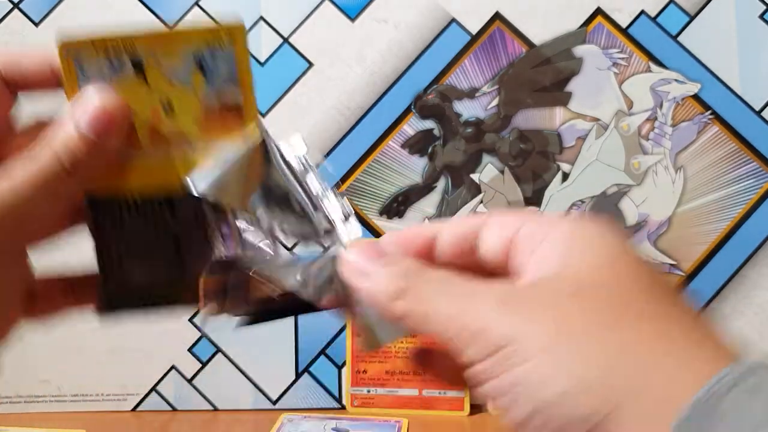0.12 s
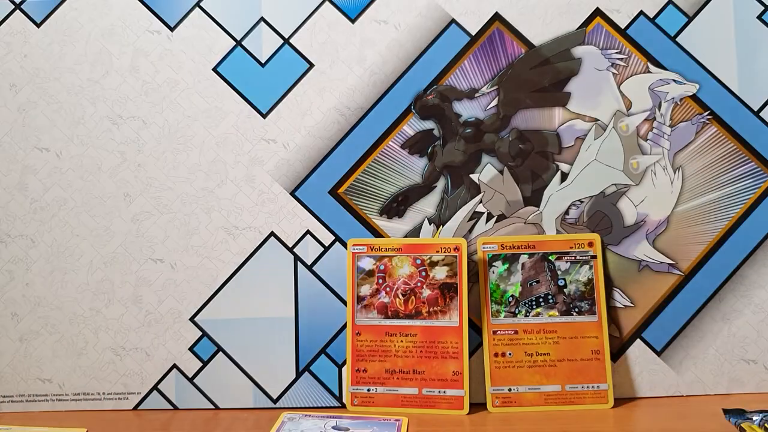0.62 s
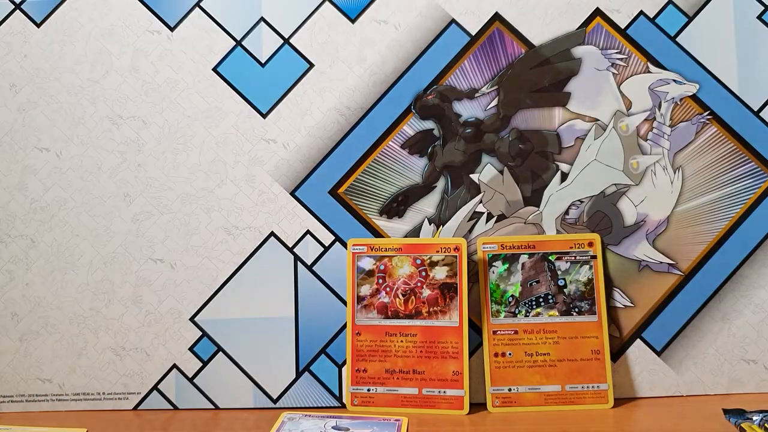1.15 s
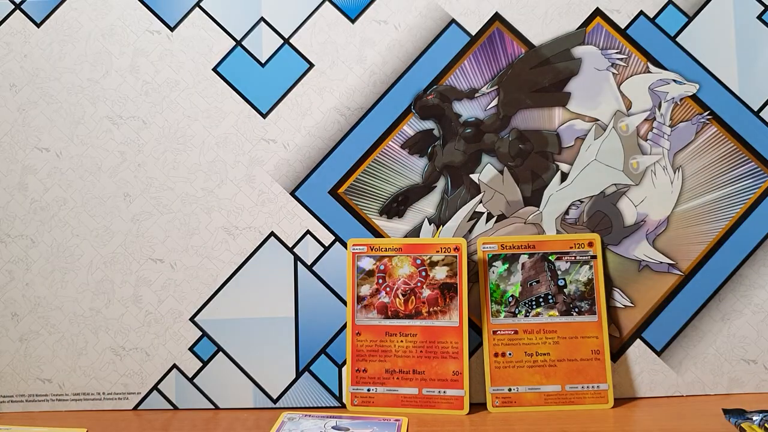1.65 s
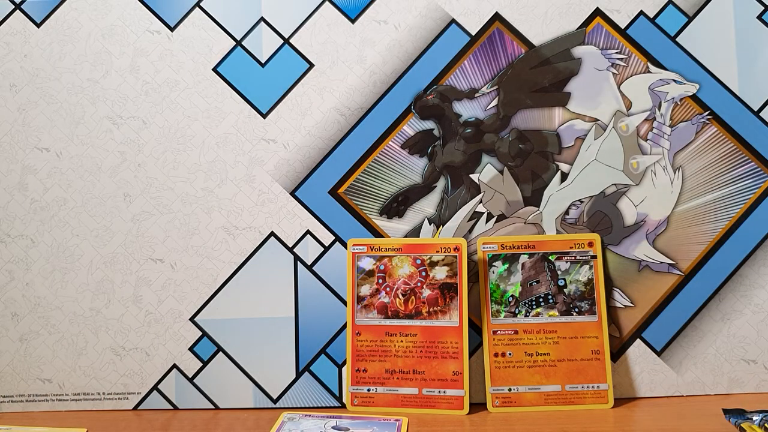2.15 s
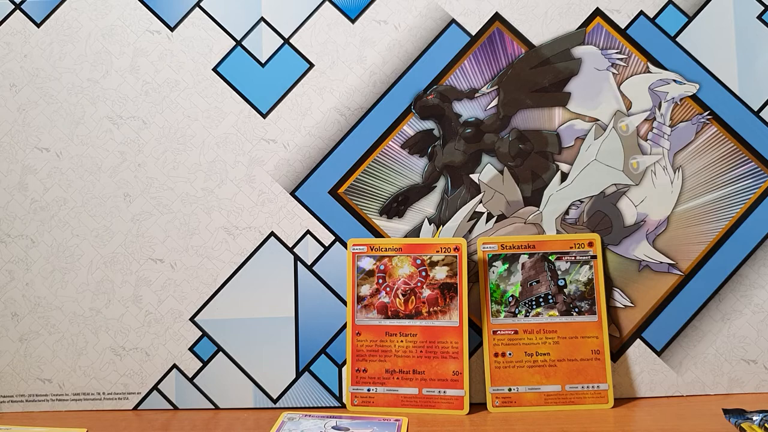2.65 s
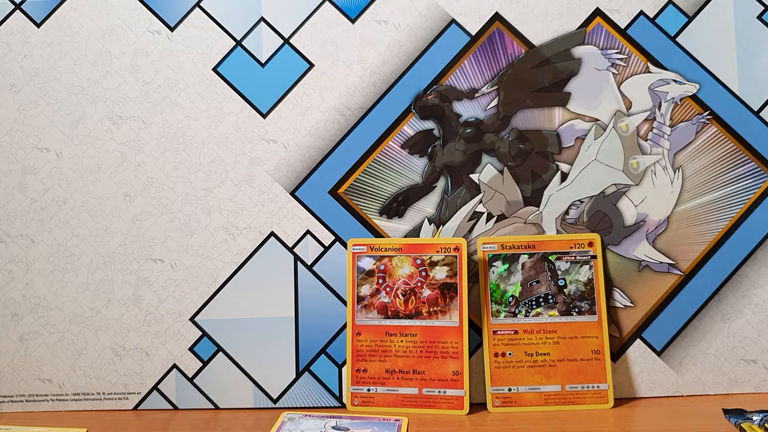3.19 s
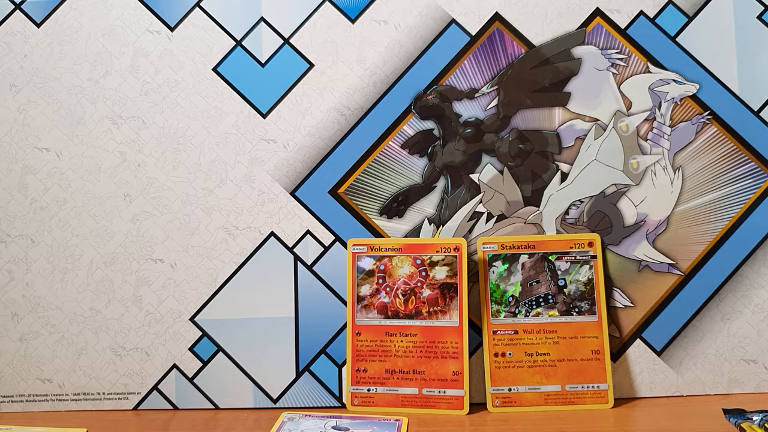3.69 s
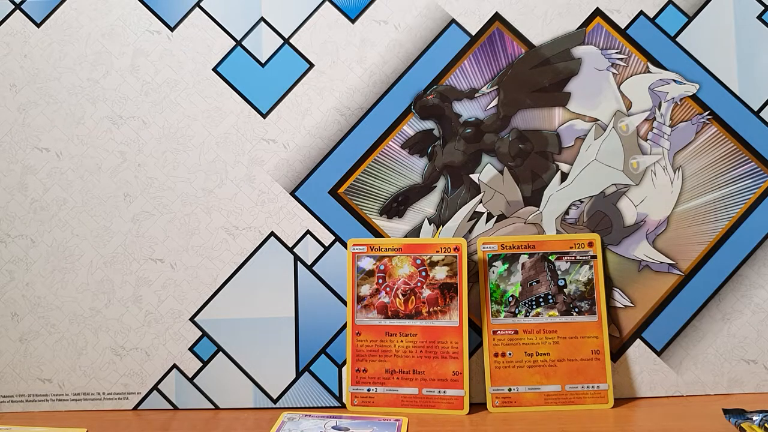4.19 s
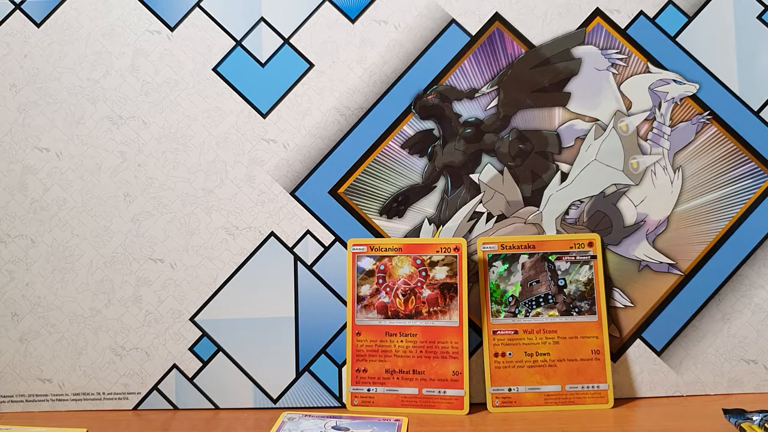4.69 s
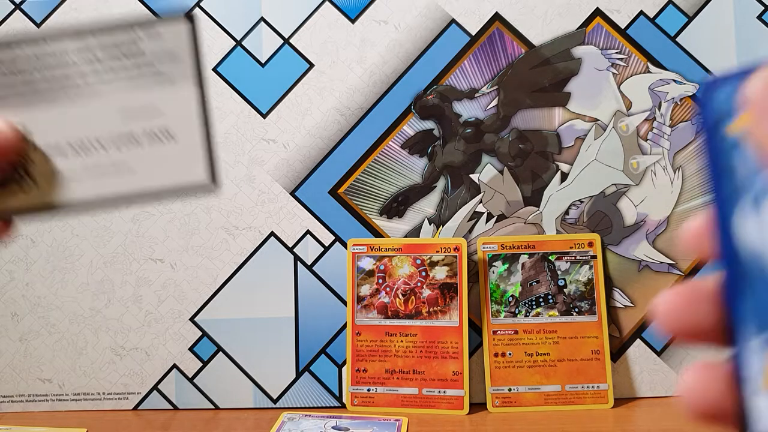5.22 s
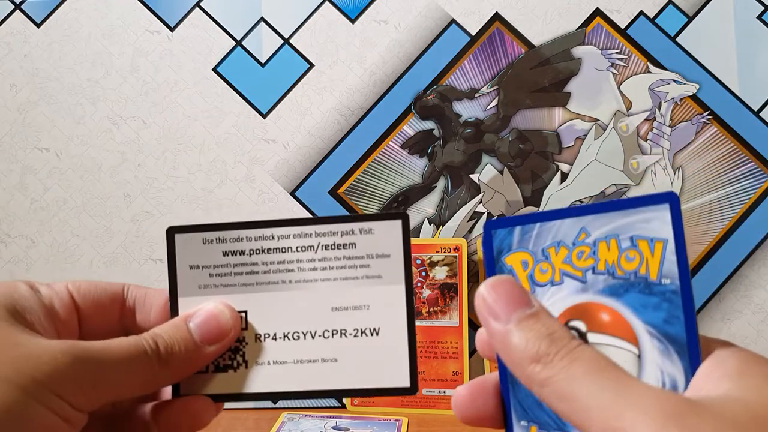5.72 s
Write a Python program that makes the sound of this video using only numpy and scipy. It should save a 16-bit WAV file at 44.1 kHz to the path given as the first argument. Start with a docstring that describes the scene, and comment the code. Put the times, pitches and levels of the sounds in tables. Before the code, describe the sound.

A close stereo phone pickup in a small, quiet room with faint rumble, hum and hiss. At 0-0.25 s foil cracks and crinkles brightly while a hand swing pushes heavy low air over the left port. It drops to near quiet, then small snaps return from 0.7 s. Around 1.0-1.1 s comes a dense, leftward burst of foil crackle and card scuffing with soft bumps on wood. A flat card slap lands at 1.4 s, a lighter one at 1.7 s amid more crinkling. From 2 to 3 s there are mainly muffled hand bumps and skin rubbing the table, then a very faint high squeak. Cards slap at 3.05 and 3.65 s. From 3.9 to 4.8 s, dry card slides and hollow clicks come in quick strokes, with a low puff of air on the left at 4.6-4.7 s. After 5 s only soft bumps and slight rubbing remain.

```python
"""Foil wrapper and thin cards at a wooden table

A small room; hands work beside a phone with two microphone ports. Foil and card edges snap with noise
cracks and short rings, cards slap flat through table and card resonances, and strokes slide cards
and crinkle foil as swelling, grainy noise. Skin rubs the wood, a card squeaks as a gliding sine, and
swings of the hand push air over the left port. Faint rumble, hum and hiss lie under all."""
import sys
import numpy as np
from scipy import signal
from scipy.fft import rfft, irfft, next_fast_len
from scipy.io import wavfile
from scipy.ndimage import uniform_filter1d, map_coordinates

SR = 44100
rng = np.random.default_rng(int(sys.argv[2]) if len(sys.argv) > 2 else 0)


def transcribe(signal):
    """Save signal, clipped to [-1, 1], as a 16-bit WAV file at the path in sys.argv[1]."""
    frames = np.atleast_2d(signal).T
    limited = np.clip(frames, -1, 1)
    pcm = np.round(limited * 32767).astype(np.int16)
    wavfile.write(sys.argv[1], SR, pcm)


def elevation(decibels):
    """Turn decibel levels (scalar or array-like) into linear amplitude ratios."""
    levels = np.asarray(decibels, float)
    return 10 ** (levels / 20)


N = 257479


def unit(x):
    """Scales x to rms 1."""
    return x / np.sqrt(np.mean(x ** 2) + 1e-20)


def along(points, hz):
    """Reads (Hz, value) points on a log frequency axis."""
    f, value = np.transpose(points)
    return np.interp(np.log(hz + 1), np.log(f + 1), value)


def curves(rows, outside=None):
    """Gives one value per sample for each column after the time."""
    s, *columns = np.transpose(rows)
    return [np.interp(np.arange(N) / SR, s, column, outside, outside) for column in columns]


def wobble(rate):
    """Draws a smooth random curve with rate knots a second."""
    knots = rng.standard_normal(int(N * rate / SR) + 4)
    return map_coordinates(knots, [np.arange(N) * rate / SR])


def filtered(x, response):
    """Applies a complex response of frequency to x."""
    m = next_fast_len(N + SR // 2)
    return irfft(rfft(x, m) * response(np.fft.rfftfreq(m, 1 / SR)), m)[..., :N]


def resonances(modes):
    """Causal response of (Hz, width, dB) modes, summed with alternating sign."""
    def response(f):
        total = 0
        for k, (center, width, db) in enumerate(modes):
            damping = 1j * f * width
            total = total + (-1) ** k * elevation(db) * damping / (center * center - f * f + damping)
        return total
    return response


# how alike the two microphone ports hear a sound: pitch_hz, likeness (0 to 1)
PORT_LIKENESS = [(60, 0.78), (300, 0.99), (700, 0.13), (1400, 0.024)]


def pair(spectrum, source):
    """Colours two raw signals and mixes them to the likeness of the two ports, rms 1."""
    def mid_and_side(hz):
        turn = np.arccos(np.clip(along(PORT_LIKENESS, hz), -1, 1)) / 2
        return elevation(along(spectrum, hz)) * [np.cos(turn), np.sin(turn)]
    mid, side = filtered(source, mid_and_side)
    return unit(np.array([mid + side, mid - side]))


def grainy(per_s, spread_db, share):
    """Noise whose loudness jumps at tiny random slips, the same slips on both ports."""
    slips = (rng.random(N) < per_s / SR) * elevation(spread_db * rng.exponential(size=N))
    pole = np.exp(-1 / (0.0038 * SR))  # each jump decays with a 3.8 ms time constant
    jumps = unit(signal.lfilter([1], [1, -pole], slips))
    return rng.standard_normal((2, N)) * (1 - share + share * jumps)


def patchy(x, depth_db):
    """The colour shifts as the contact changes: random gain in patches of time and pitch."""
    z = signal.stft(x, nperseg=256)[2]
    field = rng.standard_normal(z.shape[1:])
    field = uniform_filter1d(uniform_filter1d(field, 5, 0), 8, 1)
    return signal.istft(z * elevation(depth_db * unit(field)), nperseg=256)[1][:, :N]


def bursts(rows):
    """Noise bursts of random sign from rows (s, dB, rise s, t60 s, left over right dB)."""
    out, t = np.zeros((2, N + SR)), np.arange(SR // 3) / SR
    for s, db, rise, t60, pan_db in rows:
        shape = (1 - np.exp(-t / max(rise, 1e-5))) * elevation(db - 60 * t / max(t60, .003))
        out[:, round(s * SR):][:, :len(t)] += shape * elevation([[pan_db / 2], [-pan_db / 2]])
    return out[:, :N] * np.sign(rng.standard_normal((2, N)))


def swells(s, db, rise, fade):
    """Sum of gains that swell to a crest and fade, 20 dB in each given time (held to .003-1 s)."""
    grid = np.arange(0, N + 64, 64)
    t = grid / SR - np.asarray(s)[:, None]
    before = -t / np.clip(rise, .003, 1)[:, None]
    after = t / np.clip(fade, .003, 1)[:, None]
    gains = elevation(db[:, None] - 20 * np.where(t < 0, before, after))
    return np.interp(np.arange(N), grid, gains.sum(0))


# colour of the distant rumble: pitch_hz, level_db (per Hz, relative)
RUMBLE_COLOUR = [(20, -18.5), (35, -9.5), (60, 4), (110, -8), (200, -17.5), (300, -27.5), (500, -39.5),
                 (800, -120)]
# colour of the microphone hiss: pitch_hz, level_db (per Hz, relative)
HISS_COLOUR = [(210, -31.5), (350, -8), (730, -10.5), (1570, -8), (2200, -11.5), (2460, -9.5), (2580, -12),
               (4820, -19.5), (6640, -6), (7550, -18.5), (16000, -19)]
# lean of rumble and hiss between the ports: pitch_hz, left_over_right_db
TONE_LEAN = [(60, 2.5), (300, 18.5), (3000, -6.5), (6500, -22.5), (10000, -6)]
# hum tones, before their waver: pitch_hz, level_db (peak)
HUM_TONES = [(48, -62.5), (149, -67)]


def room_tone():
    """Distant rumble, a slightly unsteady hum and the hiss of the two microphones."""
    rumble = elevation(-67) * pair(RUMBLE_COLOUR, rng.standard_normal((2, N)))
    hiss = elevation(-83) * pair(HISS_COLOUR, rng.standard_normal((2, N)))
    t = np.arange(N) / SR
    waver_db, drift_rad = wobble(6), .5 * wobble(4)
    hum = sum(elevation(db + waver_db) * np.sin(2 * np.pi * hz * t + drift_rad) for hz, db in HUM_TONES)
    leaning = filtered(rumble + hiss, lambda hz: elevation(np.outer([.5, -.5], along(TONE_LEAN, hz))))
    return leaning + hum


# how fast the small room dies away: pitch_hz, t60_s
WALL_DECAY = [(150, 0.21), (1500, 0.1), (10000, 0.096)]


def walls(x):
    """Each frequency of the room's answer dies at its own speed."""
    hz, t, z = signal.stft(rng.standard_normal((2, SR // 2)), SR, nperseg=256)
    decay = elevation(-60 * t / along(WALL_DECAY, hz)[:, None])
    tail = signal.istft(z * decay, SR, nperseg=256)[1]
    late = np.pad(x, ((0, 0), (130, 0)))  # the answer starts 3 ms late
    return signal.fftconvolve(late, tail / np.linalg.norm(tail[0]), axes=1)[:, :N]


# air swept over the left port, one list per swing of the hand: time_s, level_db
AIR_SWINGS = [
    [(0.0, -36.5), (0.032, -9), (0.048, -13.5), (0.068, -14), (0.14, -10), (0.188, -31.5), (0.288, -39.5),
     (0.32, -47.5), (0.384, -43.5), (0.44, -76)],
    [(4.55, -57), (4.596, -37), (4.628, -33), (4.684, -26), (4.81, -43.5), (4.82, -62), (4.87, -38.5),
     (4.928, -49), (4.97, -84)],
]
# colour of the rolling air: pitch_hz, level_db (per Hz, relative)
AIR_COLOUR = [(13, -41), (22, -10), (48, 13), (97, 3.5), (225, -11), (262, -19.5), (296, -24), (345, -24),
              (600, -41), (780, -76), (1320, -120)]
# single eddies of differing strength hitting the left port: start_s, level_db, pitch_hz (of the swing)
SINGLE_EDDIES = [(0.032, -12, 89.5), (0.09, -15, 94), (0.114, -48, 88), (0.134, -13.5, 86),
                 (4.599, -25, 83), (4.674, -12.5, 82.5), (4.7, -16, 85)]


def gusts():
    """Turbulence at the left port, 40 dB down at the right: rolling air noise and single eddies."""
    level = sum(elevation(curves(rows, -120)[0]) for rows in AIR_SWINGS)
    swing = filtered(rng.standard_normal(N), lambda hz: elevation(along(AIR_COLOUR, hz)))
    size = np.sqrt(np.abs(uniform_filter1d(swing ** 2, SR // 50)) + 1e-9)
    air = level * unit(swing / size ** 1.1)  # evened out so the level curve sets its loudness
    t = np.arange(N) / SR
    for s, db, hz in SINGLE_EDDIES:
        cycles = (t - s) * hz - .6
        air = air + elevation(db) * np.exp(-(cycles / 0.87) ** 2) * np.sin(2 * np.pi * cycles)
    return air * elevation([[0], [-40]])


# resonances of the wooden table top: pitch_hz, width_hz, level_db
TABLE_MODES = [(88, 35, 8), (245, 41, 13), (335, 40, 7.5), (428, 65, 7), (537, 75, 5.5), (620, 50, 8),
               (940, 160, -2)]


def wood(x):
    """The table top rings alike on both ports in the bass."""
    both = np.array([x[0] + 0.15 * x[1], x[0] - 0.15 * x[1]])
    return filtered(both, resonances(TABLE_MODES))


# soft bumps of the hand on the table: start_s, level_db, t60_s
HAND_BUMPS = [(1.003, -27.5, 0.054), (1.082, -28, 0.084), (1.247, -35, 0.023), (1.981, -43, 0.03),
              (2.146, -42, 0.08), (2.277, -46, 0.08), (2.344, -38, 0.056), (2.469, -40, 0.039),
              (2.587, -29, 0.072), (2.723, -34.5, 0.058), (2.827, -49.5, 0.082), (2.893, -30, 0.051),
              (3.231, -40, 0.037), (4.153, -47, 0.11), (4.28, -50.5, 0.13), (4.424, -63, 0.084),
              (4.466, -58.5, 0.084), (4.772, -50, 0.089), (5.028, -50.5, 0.079), (5.243, -39.5, 0.092),
              (5.316, -33, 0.068), (5.355, -48.5, 0.16), (5.484, -37.5, 0.039)]


def bumps():
    """Knuckles and wrists are soft, so mostly the low table modes answer."""
    s, db, t60 = np.transpose(HAND_BUMPS)
    push = bursts(zip(s, db + 7, np.full(len(s), .006), t60, 0 * s))
    return filtered(wood(push), lambda hz: 1 / (1 + 1j * hz / 600))


# strokes of the hands, times per 20 dB:
# crest_s, card_level_db, foil_level_db, swell_s, fade_s
HAND_STROKES = [(.01, -51, -44.5, 1.2, 0.0848), (.045, -49.5, -44, 0.1, 0.08), (.085, -59.5, -51, 0.2, .05),
                (.124, -55, -49, 0.2, 0.01), (.19, -49, -46.5, -1.3, -0.01), (.232, -66, -63.5, -0.3, 0.07),
                (.35, -90.5, -69, 0.4, 0.44), (.585, -79, -68, -0.02, -0.03), (.712, -68, -62, .004, 0),
                (.747, -54, -48, 0.03, -0.02), (.848, -62, -53.5, 0.16, -0.26), (.882, -63, -59, 0.17, .1),
                (.93, -68, -65, 0.06, -0.1), (.995, -48.5, -43.5, 0.02, 0.07),
                (1.028, -39.5, -39.5, 0.01, 0.13), (1.063, -42.5, -34.5, 0.02, 0.04),
                (1.096, -34.5, -32, 0.0416, 0.01), (1.297, -52.5, -51.5, 0.04, 0.1),
                (1.366, -75, -60.5, .08, 0.14), (1.44, -74, -62, -0.6, .2), (1.509, -60, -62, 0, 0.33),
                (1.6, -60, -65.5, -0.1, 0.17), (1.63, -68, -62, 0.06, 0.14),
                (1.675, -49.5, -50, 0.06, 0.0946), (1.717, -42.5, -35, 0.0073, 0.0661),
                (1.741, -48, -41, 0, 0.0474), (2.072, -85, -62.5, 0.02, -0.05),
                (2.164, -67, -60, 0.27, 0.07), (2.286, -92.5, -65, 0.12, 0.6), (2.413, -85, -66, -0.5, .15),
                (2.55, -82, -63.5, -0.05, 0), (2.6, -67, -60, 0.03, 0), (2.759, -62.5, -52.5, 0.16, 0.03),
                (2.914, -72, -69.5, .15, 0.16), (2.955, -88, -64, .02, -0.02), (3.08, -80, -68, 0.13, 0.03),
                (3.15, -66, -58, 0.02, 0.14), (3.231, -68, -65, 0.23, 0.04), (3.32, -81, -62.5, 0.03, 0.23),
                (3.385, -71, -66, -0.08, -0.23), (3.423, -66, -62.5, .06, .1),
                (3.486, -60.5, -57.5, -0.05, 0.13), (3.67, -72, -59, -0.1, .15),
                (3.731, -58, -57, 0.18, 0.22), (3.775, -53.5, -56.5, 0, 0.03), (3.876, -62.5, -51, 0, 0.13),
                (3.917, -57.5, -58, 0.03, 0.06), (3.961, -57.5, -55.5, 0.05, 0.07),
                (4.158, -47.5, -57, -0.02, 0.06), (4.198, -34.5, -48.5, 0.0228, 0.0146),
                (4.24, -80, -70, 0.3, 0.1), (4.327, -62, -65, 0.03, 0.12), (4.398, -65, -58, 0.03, -0.1),
                (4.42, -49.5, -46.5, 0.03, 0.05), (4.472, -41.5, -49.5, 0.0034, 0.04),
                (4.46, -62, -58, 0.07, 0), (4.53, -65, -59.5, 0.05, 0.2), (4.604, -54, -54, 0.03, 0.06),
                (4.62, -40.5, -47, -0.0043, -0.0134), (4.701, -67.5, -57, 0.14, 0.18),
                (4.73, -89, -58.5, 0.2, 0.07), (4.753, -70, -58.5, -0.05, .05),
                (4.773, -42.5, -52, 0.0145, 0.0222), (4.87, -75.5, -68.5, -0.5, 0.28),
                (4.949, -75, -61, -0.05, 0.08), (5.035, -75, -101, .006, .04),
                (5.25, -79.5, -82, -0.16, -0.05), (5.33, -74, -76, 0.13, 0.17),
                (5.496, -75.5, -69.5, .08, 0.15)]


def stroke_gain(material, from_s=0):
    """Loudness of the strokes after from_s, each swelling and fading as the hand moves."""
    s, card_db, foil_db, rise, fade = np.transpose([row for row in HAND_STROKES if row[0] > from_s])
    return swells(s, {"card": card_db, "foil": foil_db}[material], rise, fade)


# skin dragging on the table top: time_s, level_db
SKIN_DRAG = [(.35, -84.5), (.52, -68), (.59, -69.5), (.68, -56.5), (.76, -59), (.85, -58.5), (.95, -75),
             (1.2, -71.5), (1.4, -65), (1.5, -61), (1.6, -47.5), (1.7, -61), (1.79, -51.5), (1.83, -57.5),
             (2.02, -65.5), (2.07, -70), (2.17, -63.5), (2.36, -58), (2.49, -53.5), (2.8, -59.5),
             (3.0, -68.5), (3.15, -60), (3.33, -77.5), (3.43, -64), (3.6, -77), (3.73, -59), (3.82, -91),
             (3.96, -74), (4.09, -93), (4.3, -69.5), (4.8, -72), (5.03, -69), (5.15, -86), (5.3, -62),
             (5.5, -64), (5.6, -99)]
# colour of skin on wood: pitch_hz, level_db (per Hz, relative)
RUB_COLOUR = [(24, -34.5), (40, -1), (242, -1.5), (283, -8), (393, -8.5), (719, -17.5), (841, -14),
              (1410, -31), (1740, -30), (2500, -49.5), (3250, -76), (5500, -120)]


def rub():
    """Skin drags on wood in tiny slips; strokes and a short skid after each bump press on it too."""
    s, bump_db, _ = np.transpose(HAND_BUMPS)
    lag_s, skid_fade_s = .015, .039
    skid = swells(s + lag_s, bump_db - 21, lag_s + 0 * s, skid_fade_s + 0 * s)
    press = elevation(-12.5) * stroke_gain("card", from_s=.4)  # until then the hands are in the air
    pressure = elevation(curves(SKIN_DRAG, -120)[0]) + press + skid
    grain = patchy(grainy(per_s=160, spread_db=2.2, share=0.44), depth_db=2)
    return pressure * elevation(3 + 1.9 * wobble(25.05)) * pair(RUB_COLOUR, grain)


# glossy card faces squeaking as they slide: time_s, pitch_hz, level_db
CARD_SQUEAK = [(2.965, 14180, -90.5), (2.991, 13340, -65.5), (3.035, 13850, -81), (3.095, 15650, -80),
               (3.109, 15330, -76), (3.125, 15160, -91)]


def squeak():
    """A thin high stick-slip whistle that glides with finger pressure."""
    hz, db = curves(CARD_SQUEAK, -200)
    return elevation(db + 2 + 2.5 * wobble(60)) * np.sin(2 * np.pi * np.cumsum(hz) / SR)


# cards landing flat on the table: start_s, level_db, rise_s, bright_db (flutter, relative)
CARD_SLAPS = [(1.416, -21.5, 0.0112, -6.5), (1.684, -31.5, 0.0024, -13.5), (3.056, -25, 0.007, -5.5),
              (3.643, -22, 0.0108, -5.5)]
# resonances of a flexing card: pitch_hz, width_hz, level_db
CARD_MODES = [(986, 150, -0.5), (1545, 160, 0), (1980, 160, 2.5), (2320, 280, 1), (2950, 210, -0.5),
              (4170, 3300, -15.5), (6000, 3400, -18.5)]


def slaps():
    """Air squeezed from under a card thumps the table while the card flutters."""
    s, db, rise, bright_db = np.transpose(CARD_SLAPS)
    thump_t60_s, flutter_t60_s = np.full(len(s), .1134), np.full(len(s), .18)
    thump = wood(bursts(zip(s, db + 9, 0.67 * rise, thump_t60_s, 0 * s)))
    flap = bursts(zip(s, db + bright_db + 11.5, rise, flutter_t60_s, -0.9 + 0 * s))  # a little to the right
    return thump + filtered(flap, resonances(CARD_MODES))


# resonances of the bare stack of cards in the hand: pitch_hz, width_hz, level_db
DECK_MODES = [(573, 66, -2), (890, 76, 2), (1595, 315, -2.5), (1900, 93, -11.5), (2290, 11, -12),
              (2470, 57, 1), (3110, 77, -10)]


def deck(x):
    """Once the stack of cards is bare in the hand, slides and edge cracks ring it."""
    held = np.clip((np.arange(N) / SR - 3.8) * 20, 0, 1)  # from 3.8 s, over 50 ms
    ringing = elevation(5) * filtered(x, resonances(DECK_MODES))
    plain = elevation(-2.5) * x
    return (1 - held) * x + held * (ringing + plain)


# where the busy hands are: time_s, left_over_right_db
HANDS_SIDE = [(0, -1), (.25, 2), (.8, 2.5), (1.0, 9), (1.1, 6.5), (1.15, 0), (1.3, 5.5), (1.6, 1.5),
              (1.73, 4), (1.85, -4), (2.15, 4.5), (2.6, 6.5), (3.1, 2), (3.5, -2.5), (3.8, -5), (3.96, -1),
              (4.2, -0.5), (4.4, -4), (4.75, 0.5), (5.0, 3), (5.6, -2.5)]


def side_of_hands(s):
    """Left over right level in dB of the hands at the given seconds."""
    return np.interp(s, *np.transpose(HANDS_SIDE))


def at_hands(x):
    """Places a sound between the ports by level, where the hands are."""
    return x * elevation(np.outer([.5, -.5], side_of_hands(np.arange(N) / SR)))


# colour of card sliding on card: pitch_hz, level_db (per Hz, relative)
SCUFF_COLOUR = [(290, -36), (500, -4.5), (650, -7), (800, -6.5), (1120, -5), (1300, -7.5), (1700, -5.5),
                (2300, -4), (3100, -2), (4200, -5), (6000, -25.5), (9000, -120)]


def scuff():
    """Cards slide on cards in many tiny slips, ringing the stack once it is bare."""
    grain = patchy(grainy(per_s=250, spread_db=3.075, share=0.22), depth_db=2.7)
    slide = stroke_gain("card") * elevation(1.7 * wobble(40)) * pair(SCUFF_COLOUR, grain)
    return at_hands(deck(slide))


# colour of crinkling foil: pitch_hz, level_db (per Hz, relative)
FOIL_COLOUR = [(1760, -28), (3000, -11), (3810, -6.5), (4410, -2), (5840, -1.5), (6530, 1), (7940, -6.5),
               (10700, -6.5), (15600, 0), (16200, -8)]


def foil():
    """Foil crinkles under the strokes as bright noise with small jumps in loudness."""
    grain = patchy(grainy(per_s=240, spread_db=4, share=0.35), depth_db=1.4)
    return at_hands(stroke_gain("foil") * elevation(2.1 * wobble(40)) * pair(FOIL_COLOUR, grain))


# snaps of foil and card edges: start_s, level_db, sizzle_db (relative), pitch_hz (of the ring)
EDGE_SNAPS = [(0.0272, -11.5, 2.5, 1980), (0.0366, -25.5, -6, 4870), (0.0756, -36, 5, 5700),
              (0.123, -38.5, 5, 5400), (0.1713, -17, 2, 929), (0.1837, -35.5, -0.5, 990),
              (0.2242, -37.5, 6.5, 5450), (0.3386, -53.5, 14, 4910), (0.489, -70.5, 14, 6000),
              (0.7081, -47, 3, 820), (0.7388, -41, 2.5, 5060), (0.7644, -45, -3.5, 2260),
              (0.784, -32, -3, 1680), (0.79, -42, 7, 1040), (0.8233, -38, -1, 4300),
              (0.8353, -50.5, 8.5, 4100), (0.8427, -40.5, 3.5, 2950), (0.8738, -41, -6, 3000),
              (0.8905, -51.5, 13.5, 2930), (0.952, -32, -4.5, 3430), (1.0066, -32.5, 2.5, 5700),
              (1.012, -23, -9, 3140), (1.0604, -28.5, 3, 4640), (1.0827, -20, -6, 5540),
              (1.0853, -27.5, -2, 1185), (1.0954, -23, 1.5, 1180), (1.1043, -30.5, -1.5, 4200),
              (1.1648, -38, -14, 1300), (1.2094, -63, 13.5, 4110), (1.2151, -61, 13, 3320),
              (1.2202, -42.5, -6, 1910), (1.236, -57, 8, 4000), (1.264, -54.5, 7, 1090),
              (1.2922, -40.5, -4.5, 776), (1.2995, -32, -11.5, 3660), (1.3058, -35, 6, 4050),
              (1.3713, -49.5, -7, 1870), (1.5468, -46, -13, 810), (1.577, -37, -14, 840),
              (1.6228, -43.5, -7.5, 3620), (1.6584, -37.5, -4, 5900), (1.7148, -29.5, -7, 3670),
              (1.7188, -24.5, -2, 4600), (1.7365, -28, -0.5, 4200), (2.149, -54, -2, 5560),
              (2.7131, -51.5, 9, 860), (2.7535, -49, 0, 5620), (3.3802, -44.5, -5, 5000),
              (3.4809, -41.5, -2.5, 5200), (3.5266, -39, -5.5, 5850), (3.7451, -41, -10, 2020),
              (3.774, -43.5, -6, 1730), (3.9134, -46, -8.5, 2270), (3.9638, -33, -11, 2470),
              (4.1545, -33, -17.5, 834), (4.1883, -26, -15.5, 1980), (4.1958, -28, -14, 1630),
              (4.3255, -43.5, -16, 1390), (4.3945, -41, -2.5, 1000), (4.4174, -30, -3, 3100),
              (4.4708, -36, -1, 740), (4.487, -34, -4, 1130), (4.612, -39, -0.5, 3570),
              (4.751, -35.5, -7, 810), (4.7685, -27, -11, 2430)]


def snaps():
    """Each buckle gives a crack with its own sizzle, and the free flap rings briefly at its own pitch."""
    s, db, sizzle_db, hz = np.transpose(EDGE_SNAPS)
    pan, quick = side_of_hands(s), np.full(len(s), .0001)
    crack_t60_s, sizzle_t60_s = np.full(len(s), .0115), np.full(len(s), .0092)
    crack = bursts(zip(s, db + 1.5, quick, crack_t60_s, pan))
    sizzle = bursts(zip(s, db + sizzle_db + 8.5, quick, sizzle_t60_s, pan))
    ring, t = np.zeros((2, N + SR)), np.arange(SR // 10) / SR
    for at, level_db, pitch, side_db, phase in zip(s, db, hz, pan, rng.random((len(s), 2, 1))):
        fall_db = 60 * t * pitch / 22  # 60 dB in 22 swings
        tone = elevation(level_db - 3.5 - fall_db) * np.sin(2 * np.pi * (pitch * t + phase))
        ring[:, round(at * SR):][:, :len(t)] += tone * elevation([[side_db / 2], [-side_db / 2]])
    body = filtered(crack, lambda f: (1j * f / (800 + 1j * f)) ** 2 / (1 + 1j * f / 7000) ** 2)
    bright = filtered(sizzle, lambda f: (1j * f / (4500 + 1j * f)) ** 3)
    return deck(body) + bright + ring[:, :N]


# tone of the snaps, slaps and bumps: pitch_hz, level_db
HIT_COLOUR = [(1000, -1), (6300, 3), (8500, -7), (13000, -7)]


def scene():
    """Hits fill the room; rubbing, sliding, squeak, air and room tone reach the ports directly."""
    hits = filtered(snaps() + slaps() + bumps(), lambda hz: elevation(along(HIT_COLOUR, hz)))
    room = elevation(-9) * walls(hits)
    hands = rub() + scuff() + foil() + squeak()
    return hits + room + hands + gusts() + room_tone()


def low_pass(x):
    """Removes everything above the highest recorded frequency."""
    return signal.sosfilt(signal.butter(12, 17000, fs=SR, output="sos"), x)


def record(dry):
    """The phone cuts the deepest bass, below about 30 Hz, and keeps nothing above its band limit."""
    def band(hz):
        return (hz < 15850) * (1j * hz / (30 + 1j * hz)) ** 3
    mix = filtered(dry, band)
    return low_pass(mix)


dry = scene()
out = record(dry)
transcribe(out)
```